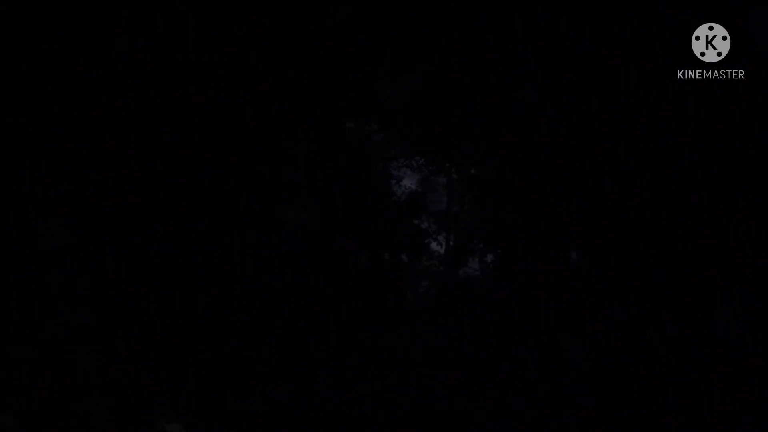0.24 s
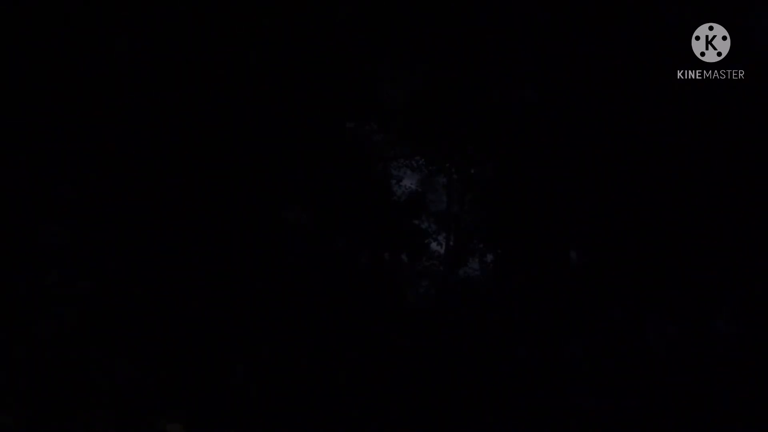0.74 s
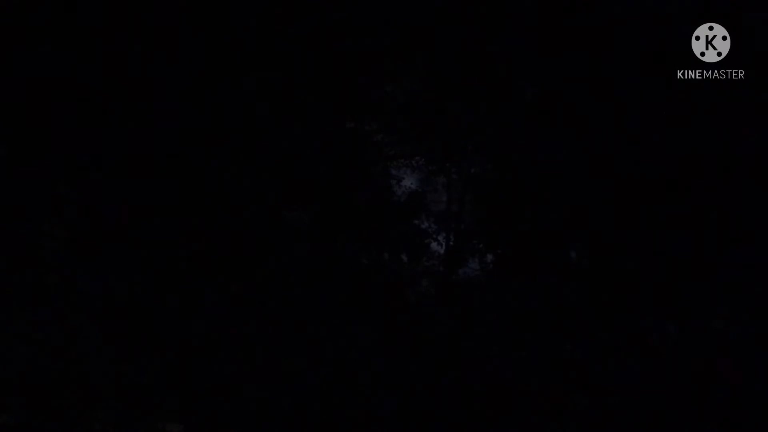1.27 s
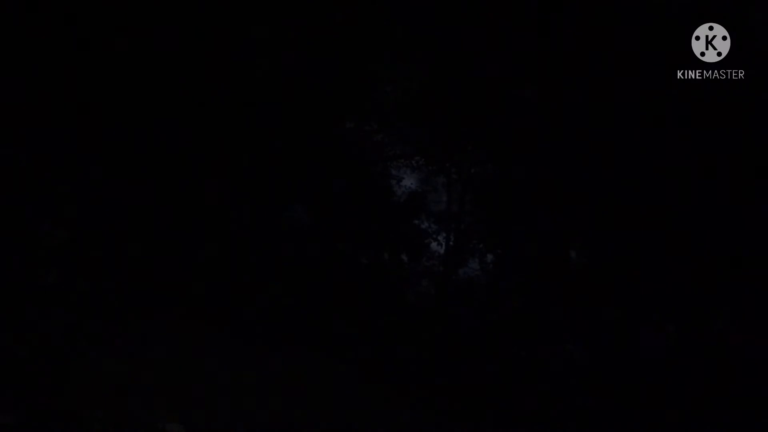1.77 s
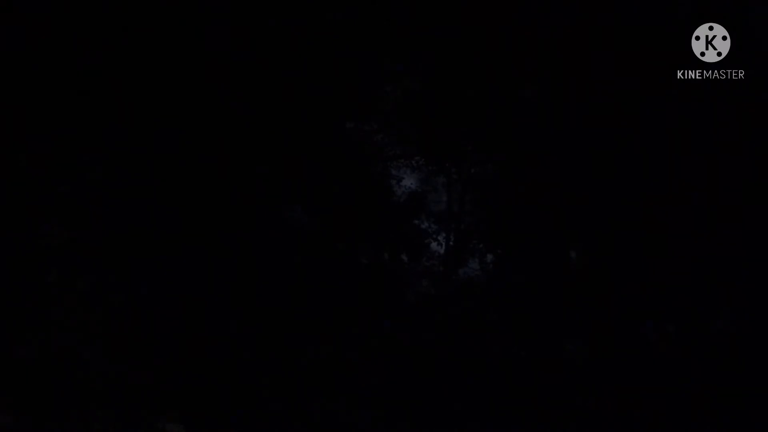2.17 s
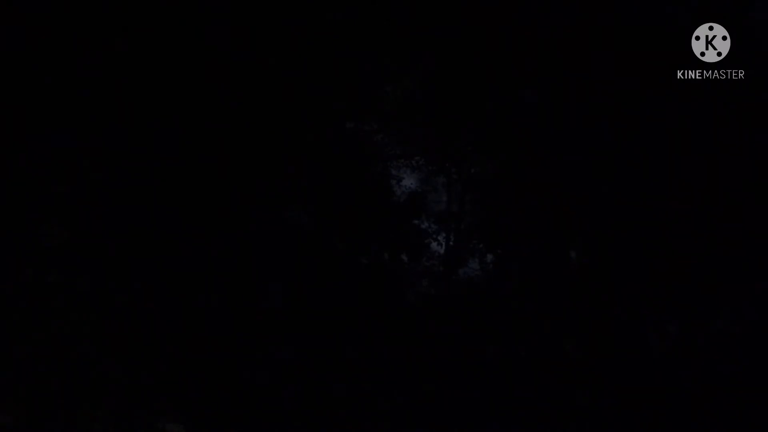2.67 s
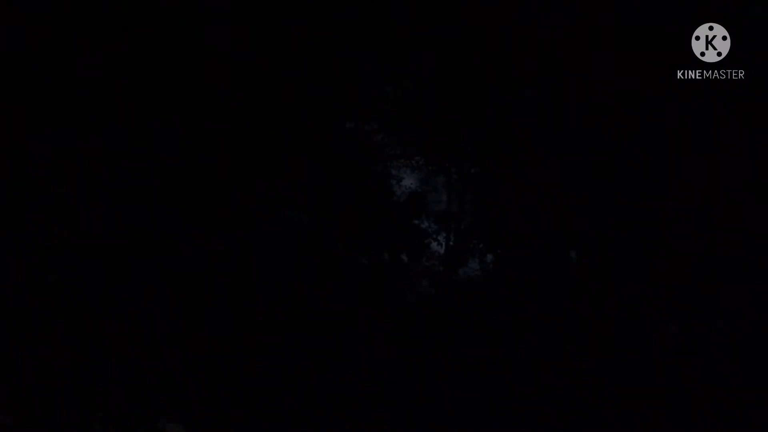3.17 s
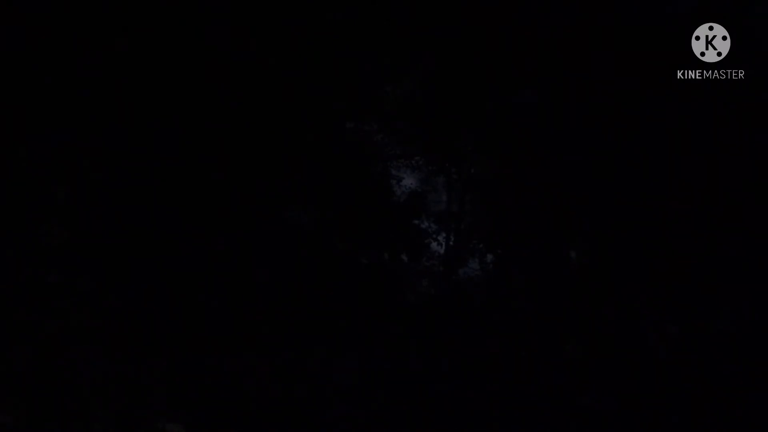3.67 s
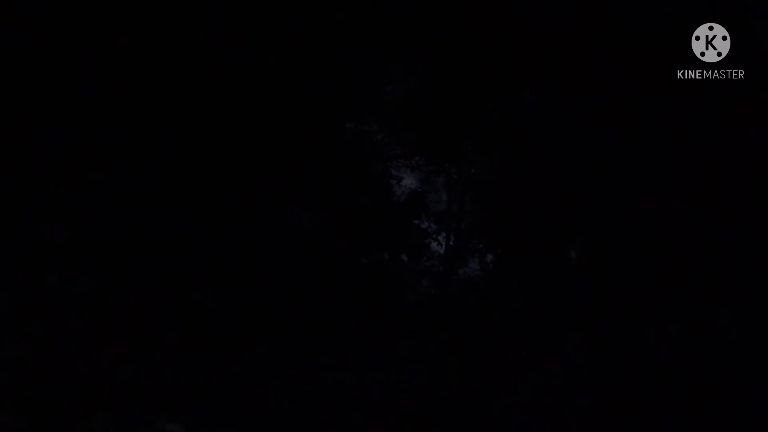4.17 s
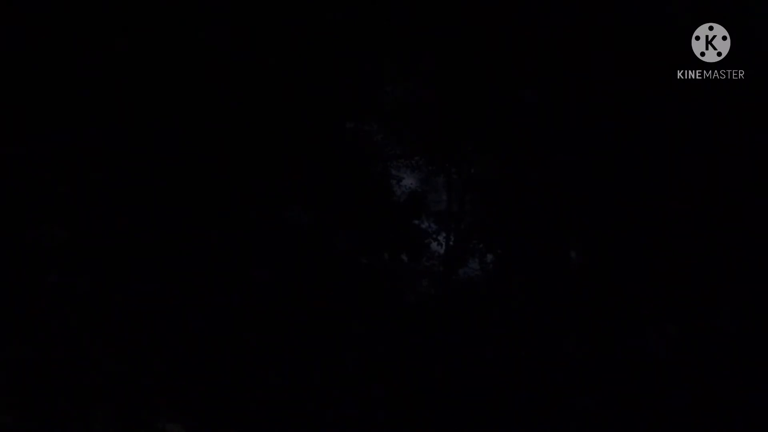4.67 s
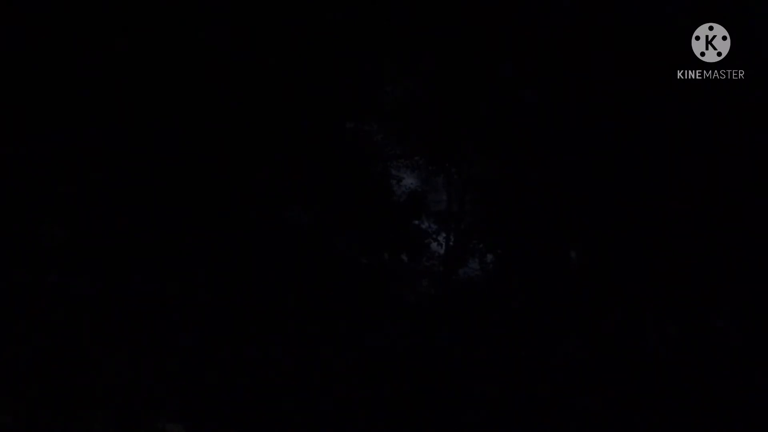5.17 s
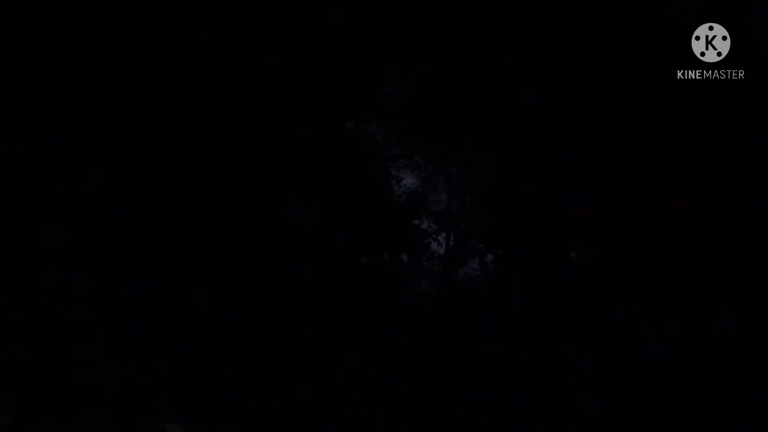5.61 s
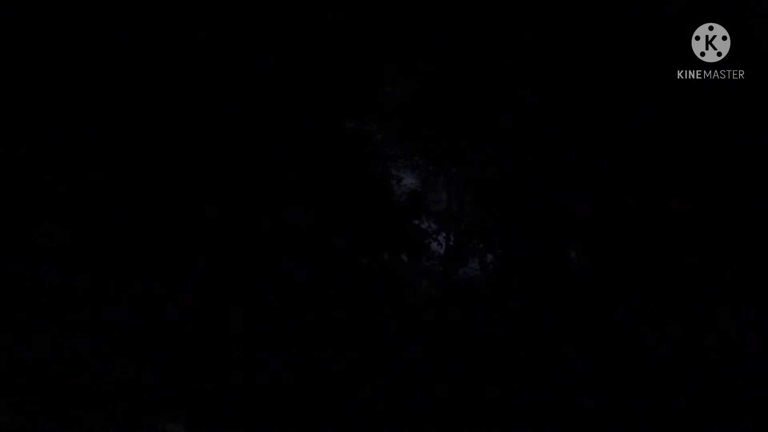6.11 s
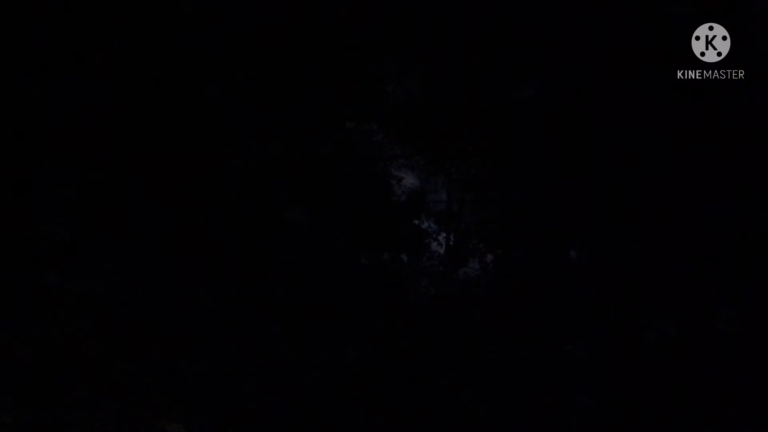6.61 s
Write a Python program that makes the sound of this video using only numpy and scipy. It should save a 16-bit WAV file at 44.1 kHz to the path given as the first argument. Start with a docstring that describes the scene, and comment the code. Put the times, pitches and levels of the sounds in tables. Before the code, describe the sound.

From 0 to about 7 seconds a quiet outdoor night holds a continuous shrill cricket shimmer near 6.6 kHz, with softer trills around 2.3 kHz swelling gently. Faint air rumble and a distant engine, a wavering hum around 80 to 95 Hz, sit far below. The tail of a far katydid swell opens the scene; near katydids start around 0.2, with dry, rattling phrases from about 0.26, 0.44, 1.0, 1.6, 1.8, 2.2, 3.1, 3.5, 4.0, 4.8, 5.3, 5.9 and 6.6. Each has a soft lead-in, then two to six strokes roughly 0.09 apart. Those at 0.44, 1.8 and 6.6 are strongest. Far katydids overlap them as blurred swells. Thin high hiss lifts faintly near 0.3, 1.4 and 2.7. A higher insect gives five quick rasps at 4.4 and again at 5.9. Trees add short scattered echoes; the chorus continues to the end.

```python
"""A steady band of crickets is heard first, over night air and a far droning engine.
Near katydids soon rasp over it: a soft lead-in, then phrases of two to six wing strokes.
Farther katydids blur into swells, a higher rasping insect answers twice, and high hiss swells faintly.
Random tooth clicks ring wing modes for the rasps, wandering sines trill for the crickets,
and filtered noise makes the air, hiss and far singers. Trees scatter the near songs into a short haze."""
import sys
import numpy as np
from scipy import signal
from scipy.fft import rfft, irfft, next_fast_len
from scipy.io import wavfile
from scipy.ndimage import uniform_filter1d

SR = 44100
rng = np.random.default_rng(int(sys.argv[2]) if len(sys.argv) > 2 else 0)


def persist_wave(psi):
    """Save psi, clipped to +-1, as 16-bit WAV."""
    counts = np.round(np.clip(psi, -1, 1) * 32767).astype(np.int16)
    wavfile.write(sys.argv[1], SR, np.atleast_2d(counts).T)


N = 302085  # length in samples


def gain_of(db):
    """Decibels to an amplitude factor."""
    return 10 ** (np.asarray(db) / 20)


def evened(x):
    """Scales to rms 1."""
    return x / np.sqrt(np.mean(x ** 2) + 1e-20)


def curves(rows):
    """Draws each column of a time table as a curve, one value a sample."""
    s, *columns = np.transpose(rows)
    return [np.interp(np.arange(N) / SR, s, column) for column in columns]


def coloured(x, points):
    """Filters x to a spectrum given as (frequency_hz, level_db) and evens its level."""
    point_hz, point_db = np.transpose(points)
    size = next_fast_len(len(x))
    hz = np.fft.rfftfreq(size, 1 / SR)
    shape_db = np.interp(np.log(hz + 1), np.log(point_hz + 1), point_db, left=-90)
    filtered = irfft(rfft(x, size) * gain_of(shape_db), size)
    return evened(filtered[:len(x)])


def resonate(x, hz, width_hz):
    """A steep resonance that follows the curve hz: shift to zero, smooth twice, shift back."""
    turn = np.exp(2j * np.pi * np.cumsum(hz * np.ones(len(x))) / SR)
    pole = np.exp(-np.pi * width_hz / SR)
    two_poles = np.convolve([1, -pole], [1, -pole])
    smoothed = signal.lfilter([1], two_poles, x / turn)
    return evened((turn * smoothed).real)


def teeth(per_s, spread_db):
    """A scraper crossing file teeth: clicks at random moments, of uneven size."""
    unevenness = np.minimum(rng.exponential(1, N), 4)
    size = gain_of(spread_db * unevenness) * rng.choice([-1., 1.], N)
    clicks = rng.random(N) < per_s / SR
    return evened(size * clicks)


def strokes(times, levels_db, rise_s, fall_s, sharp):
    """Level over time of strokes that build up and stop short; a higher sharp narrows the peak."""
    t, power = np.arange(N) / SR, np.zeros(N)
    for s, db in zip(times, levels_db):
        a, b = max(int((s - rise_s) * SR), 0), int((s + fall_s) * SR)
        u = t[a:b] - s
        place = np.clip(np.where(u < 0, 1 + u / rise_s, 1 - u / fall_s), 0, 1)
        power[a:b] += gain_of(db) ** 2 * np.sin(place * np.pi / 2) ** (2 * sharp)
    return np.sqrt(power)


def held(starts, ends, levels_db, rise_s, fall_s):
    """Level over time of phrases that swell, hold from start to end and fade."""
    t, power = np.arange(N) / SR, np.zeros(N)
    for start, end, db in zip(starts, ends, levels_db):
        place = np.clip(np.minimum(1 + (t - start) / rise_s, 1 - (t - end) / fall_s), 0, 1)
        power += gain_of(db) ** 2 * place ** 4
    return np.sqrt(power)


def trees(x, t60, wet_db):
    """Adds the echoes of trunks and leaves: sparse taps of random sign, dying 60 dB in t60 seconds."""
    taps = np.zeros(SR)
    at = np.arange(400, SR - 20, 20)
    at = at + rng.integers(0, 20, len(at))
    taps[at] = rng.choice([-1., 1.], len(at))
    taps *= gain_of(-60 * np.arange(SR) / SR / t60)
    echoes = signal.fftconvolve(x, taps / np.linalg.norm(taps))[:N]
    return x + gain_of(wet_db) * echoes


# Spectrum of the night air, relative density per Hz: frequency_hz, level_db
AIR_SPECTRUM = [(20, -72), (40, -17.5), (65, -3), (110, 0.5), (200, -9), (300, -10.5), (500, -17.5),
                (1100, -22.5), (1800, -19.5), (3000, -9.5), (6000, -17), (7300, -14), (8300, -58),
                (11000, -32.5), (15700, -28.5)]
AIR_DB = -48


def air():
    """Smooth far rumble and hiss of the night: noise with a fixed spectrum."""
    return gain_of(AIR_DB) * coloured(rng.standard_normal(N), AIR_SPECTRUM)


# Wavering engine drone: time_s, pitch_hz, level_db
ENGINE_DRONE = [(0, 77.4, -48), (.35, 79.6, -55), (.6, 91.4, -57), (1.1, 94, -51.5), (1.3, 91.7, -57.5),
                (1.47, 89.6, -49.5), (1.75, 89.8, -52), (2.0, 92.6, -46.5), (2.25, 94.2, -60),
                (3.5, 92, -68), (4.3, 88, -65), (4.45, 87.7, -50), (4.68, 90, -57), (4.87, 93.7, -46.5),
                (5.12, 94, -54), (5.4, 90.8, -52), (5.9, 94, -45.5), (6.3, 96, -53), (6.85, 95.6, -64)]
# Brief surges of the engine's throb: time_s, level_db
THROB_SURGES = [(1.45, -50), (5.9, -57)]
THROB_DB, THROB_DRIFT_DB = -62, 2  # usual level, rms drift about it


def engine():
    """A far engine: a wavering low tone in a fuzzy noise halo, and a rougher throb above it."""
    hz, drone_db = curves(ENGINE_DRONE)
    tone = np.sqrt(2) * np.sin(2 * np.pi * np.cumsum(hz) / SR)
    halo = resonate(rng.standard_normal(N), hz, width_hz=20)
    drone = gain_of(drone_db) * (0.8 * tone + 0.49 * halo)
    drift = evened(uniform_filter1d(rng.standard_normal(N), SR // 4))
    surges = strokes(*np.transpose(THROB_SURGES), rise_s=.1, fall_s=.1, sharp=1.2)
    throb_level = np.hypot(gain_of(THROB_DB + THROB_DRIFT_DB * drift), surges)
    throb = resonate(rng.standard_normal(N), 176.7, width_hz=68)
    return drone + throb_level * throb


def crowd(hz, spread_hz, wander_hz, per_s, pace_spread, hold, db, count):
    """Each cricket trills a near pure tone in short chirps, at its own wandering pitch and pace."""
    out, slow_at = np.zeros(N), np.arange(N) / 64
    places = np.linspace(-1.5, 1.5, count)
    for place, pace, size, start in zip(places, *rng.standard_normal((3, count))):
        slow = uniform_filter1d(rng.standard_normal((2, N // 64 + 2)), 12)
        bend, hurry = (np.interp(slow_at, np.arange(len(v)), evened(v)) for v in slow)
        rate = per_s * (1 + pace_spread * pace + 0.0615 * hurry)
        beat = start + np.cumsum(rate) / SR
        chirps = np.maximum(np.sin(2 * np.pi * beat) + hold, 0)  # dips while the wings reopen
        pitch = hz + spread_hz * place + wander_hz * bend
        tone = np.sin(2 * np.pi * np.cumsum(pitch) / SR)
        # singers at the edges of the pitch band are softer
        out += gain_of(1.2 * size - 1.6 * place ** 2) * chirps * tone
    return gain_of(db) * evened(out)


# Cricket crowds, one row each: centre_hz, spread_hz, wander_hz, chirps_per_s,
# pace_spread (fraction), hold (offset that fills the chirp gaps), level_db
SHRILL_CROWD = (6648.5, 170, 70, 100, -0.07, 0.6, -44)
MELLOW_CROWD = (2290, 18, 15, 66, 0.07, 0.9, -54.5)
STEADY_CROWD = (2385, 7, 12, 68.5, 0.8, 2.5, -57.5)
# Swells of the lower crowds, heard relative to each column's mean over time:
# time_s, mellow_db, steady_db
LOWER_SWELLS = [(0.0, -55, -60), (1.85, -56.5, -57), (2.76, -59, -63), (3.15, -55.5, -60), (3.76, -56, -54),
                (3.87, -57, -58), (5.27, -55.5, -61), (6.49, -59, -60), (6.83, -58, -56), (6.85, -56, -59)]


def crickets():
    """Three crowds: the shrill one holds its level, the two lower ones swell about their mean."""
    lower = crowd(*MELLOW_CROWD, count=4), crowd(*STEADY_CROWD, count=3)
    shrill = crowd(*SHRILL_CROWD, count=20)
    return shrill + sum(gain_of(db - db.mean()) * c for db, c in zip(curves(LOWER_SWELLS), lower))


# Spectrum shared by the high hiss and the higher insect's rasp: frequency_hz, level_db
HIGH_SPECTRUM = [(7000, -36), (8000, -0.5), (8800, -5.5), (9600, -2), (11000, -10), (13000, -16),
                 (15500, -27)]
# Faint soft swells of high hiss: peak_s, level_db
HISS_SWELLS = [(.27, -64), (1.42, -67), (2.72, -65.5)]


def high_hiss():
    """Noise with a high narrow spectrum that swells and fades softly."""
    level = strokes(*np.transpose(HISS_SWELLS), rise_s=0.24, fall_s=0.29, sharp=0.47)
    return level * coloured(rng.standard_normal(N), HIGH_SPECTRUM)


# Phrases of the higher insect: first_stroke_s, stroke_gap_s, opening_note_db, rasp_db,
# note_growth_db (per stroke), rasp_lag_growth_s (per stroke)
HIGH_PHRASES = [(4.38, 0.0635, -53, -52, 0.6, 0.0054), (5.9, 0.0616, -50.5, -53, -1.5, .002)]
# Narrow note that opens each stroke: centre_hz, width_hz
OPENING_NOTE = (7720, 560)
RASP_LAG_S = 0.0045  # lag of the rasp behind the note at the first stroke
HIGH_UNEVEN_S, HIGH_UNEVEN_DB = .002, 1.2  # random slip and effort of each stroke
RASP_GROWS_DB, RASP_ARCH_DB, NOTE_ARCH_DB = .5, 2, 1.5  # growth per stroke, mid-phrase lifts


def high_insect():
    """Five quick rasps a phrase, each sliding up from a narrow note; the trees hold the rasp longest."""
    k = np.arange(5)
    arch = np.sin(np.pi * k / k[-1])
    first, gap, note_db, rasp_db, note_grows_db, lag_grows = np.transpose(HIGH_PHRASES)[:, :, None]
    slip, effort, grit = rng.standard_normal((len(HIGH_PHRASES) * len(k), 3)).T
    s = (first + gap * k).ravel() + HIGH_UNEVEN_S * slip
    note_db = (note_db + note_grows_db * k + NOTE_ARCH_DB * arch).ravel() + HIGH_UNEVEN_DB * effort
    rasp_db = (rasp_db + RASP_GROWS_DB * k + RASP_ARCH_DB * arch).ravel() + HIGH_UNEVEN_DB * grit
    lag = (RASP_LAG_S + lag_grows * k).ravel()
    drive = teeth(per_s=4100, spread_db=-0.5)
    note_level = strokes(s, note_db, rise_s=0.03, fall_s=0.02, sharp=0.82)
    note = note_level * resonate(drive, *OPENING_NOTE)
    rasp_level = strokes(s + lag, rasp_db, rise_s=0.032, fall_s=0.014, sharp=1.0)
    rasp = rasp_level * coloured(drive, HIGH_SPECTRUM)
    return trees(note, t60=0.59, wet_db=-8) + trees(rasp, t60=0.68, wet_db=-1.5)


# Katydid wing modes, centres at size factor 1: centre_hz, width_hz, near_singer_db, far_singer_db
WING_MODES = [(2160, 357, -4, -5), (2655, 600, -10.5, -8), (3200, 260, -3.5, -10.5),
              (3445, 150, -2.5, -1.5), (3650, 1200, -1.5, -9.5), (4550, 440, -2, -3), (4890, 195, -3, -4),
              (5186, 750, -13, -3.5), (6000, 700, -3.5, -3.5)]


def wing(drive, levels_db, factor):
    """The broad wing membrane rings in a few wide modes of alternating sign."""
    out = np.zeros(N)
    for k, ((hz, width_hz, *_), db) in enumerate(zip(WING_MODES, levels_db)):
        out += (-1) ** k * gain_of(db) * resonate(drive, hz * factor, width_hz)
    return evened(out)


# Spectrum of the thin katydid treble: frequency_hz, level_db
TREBLE_SPECTRUM = [(8500, -18.5), (10000, -12), (11500, -7), (13000, -6.5), (14500, -1.5), (15700, -6.5)]


def treble_rasp(drive):
    """The thin bright rasp of the katydids, shaped by a fixed spectrum."""
    return coloured(drive, TREBLE_SPECTRUM)


# Far katydid phrases, whose strokes run together: start_s, end_s, body_db, treble_db
FAR_PHRASES = [(-.05, .01, -45.5, -60), (0.117, .2, -57, -70), (0.304, 0.586, -47, -58.5),
               (.78, 0.902, -56.5, -71), (1.053, 1.31, -45, -58.5), (1.42, 1.475, -58.5, -75),
               (1.68, 1.953, -47.5, -61), (2.326, 2.52, -49.5, -62), (2.855, 2.92, -50, -69),
               (2.994, 3.197, -45.5, -59.5), (3.546, 3.755, -47.5, -59), (3.92, 4.0, -53.5, -77),
               (4.117, 4.4, -47, -62), (4.55, 4.74, -53, -61), (4.8, 5.056, -49, -58),
               (5.35, 5.523, -44.5, -63), (5.701, 5.821, -58, -70), (5.92, 6.119, -49.5, -57),
               (6.322, 6.468, -51, -79), (6.6, 6.9, -45, -58)]
# Phrases of one far katydid with a deeper wing: start_s, end_s, level_db
DEEP_PHRASES = [(0.987, 1.353, -65), (2.303, 2.58, -66.5), (3.55, 3.78, -68), (3.981, 4.355, -64.5),
                (5.3, 5.56, -65), (6.65, 6.904, -67.5)]
# Low tone of that deeper wing: centre_hz, width_hz
DEEP_TONE = (1510, 200)
FAR_RISE_S, FAR_FALL_S = .11, .18
DEEP_RISE_S, DEEP_FALL_S = 0.045, .06
MURMUR_DB, MURMUR_TREBLE_DB = -57, -72  # the farthest singers never fall silent


def far_katydids():
    """Far strokes blur into swells: noise through the wing modes and treble, plus one deeper wing."""
    start, end, body_db, treble_db = np.transpose(FAR_PHRASES)
    drive = rng.standard_normal(N)
    phrases = held(start, end, body_db, FAR_RISE_S, FAR_FALL_S)
    body_level = np.hypot(phrases, gain_of(MURMUR_DB))
    treble_phrases = held(start, end, treble_db, FAR_RISE_S, FAR_FALL_S)
    treble_level = np.hypot(treble_phrases, gain_of(MURMUR_TREBLE_DB))
    far_modes_db = np.transpose(WING_MODES)[3]
    swell = body_level * wing(drive, far_modes_db, 1.0) + treble_level * treble_rasp(drive)
    deep_level = held(*np.transpose(DEEP_PHRASES), DEEP_RISE_S, DEEP_FALL_S)
    return swell + deep_level * resonate(drive, *DEEP_TONE)


# Near katydid phrases: first_stroke_s, last_stroke_s, first_stroke_db, last_stroke_db,
# treble_db (relative to the body), size_factor (scales the wing modes for the singer's size)
NEAR_PHRASES = [(0.264, 0.344, -44.5, -45, -12, 1.01), (0.438, 0.698, -40, -43.5, -14, 1.025),
                (1.005, 1.336, -47, -50.5, -14, 0.96), (1.633, 1.706, -45.5, -46, -13, 0.99),
                (1.792, 2.059, -39.5, -42.5, -15.5, 1.026), (2.21, 2.587, -48, -47, -14, 1),
                (3.059, 3.33, -44, -42.5, -15, 1.03), (3.495, 3.749, -44, -45, -12.5, 1.06),
                (4.01, 4.422, -45, -51, -20, .995), (4.775, 5.04, -43, -42.5, -16, 1.03),
                (5.259, 5.49, -45, -45.5, -12, 1), (5.917, 6.206, -49, -47, -14, 1.02),
                (6.57, 6.836, -41, -41.5, -15.5, 1.02)]
STROKE_GAP_S = .087  # usual time from stroke to stroke; sets how many fit in a phrase
UNEVEN_S, UNEVEN_DB = 0.0017, 0.37  # random slip and effort of each stroke
LEAD_IN_DB = -9  # a soft stroke opens each phrase, relative to its first full stroke


def stroke_rows():
    """Spreads each phrase into evenly paced, slightly uneven strokes: s, body_db, treble_db."""
    rows = []
    for first, last, first_db, last_db, treble_db, _ in NEAR_PHRASES:
        place = np.linspace(0, 1, round((last - first) / STROKE_GAP_S) + 1)
        slip, effort, rasp = rng.standard_normal((8, 3))[:len(place)].T
        s = first + (last - first) * place + UNEVEN_S * slip
        body_db = first_db + (last_db - first_db) * place + UNEVEN_DB * effort
        rows.append([s, body_db, body_db + treble_db + UNEVEN_DB * rasp])
        lead_in_db = first_db + LEAD_IN_DB
        rows.append([[first - STROKE_GAP_S], [lead_in_db], [lead_in_db + treble_db]])
    return np.concatenate(rows, axis=1)


TREBLE_LAG_S = .001


def near_katydids():
    """Tooth clicks ring the wing and leave a thin treble rasp, scattered by the trees."""
    s, body_db, treble_db = stroke_rows()
    first, *_, size = np.transpose(NEAR_PHRASES)
    # the wing takes each singer's size from the lead-in stroke on
    singer = np.maximum(np.searchsorted(first - STROKE_GAP_S, np.arange(N) / SR) - 1, 0)
    near_modes_db = np.transpose(WING_MODES)[2]
    drive = teeth(per_s=3000, spread_db=0.5)
    body_level = strokes(s, body_db, rise_s=0.038, fall_s=0.034, sharp=0.51)
    body = body_level * wing(drive, near_modes_db, size[singer])
    treble_level = strokes(s + TREBLE_LAG_S, treble_db, rise_s=0.038, fall_s=0.042, sharp=0.5)
    treble = treble_level * treble_rasp(drive)
    return trees(body + treble, t60=.3, wet_db=-11)


def scene():
    """All singers over the hiss, the engine and the air, in one channel."""
    background = air() + engine() + crickets() + high_hiss()
    return (background + high_insect() + far_katydids() + near_katydids())[None]


EDGE_HZ = 15740  # cutoff of the low-pass


def record(dry):
    """The band limit: a steep low-pass."""
    low_pass = signal.firwin(1023, EDGE_HZ, window=("kaiser", 10), fs=SR)
    return signal.oaconvolve(dry, low_pass[None], "same")


dry = scene()
out = record(dry)
persist_wave(out)
```